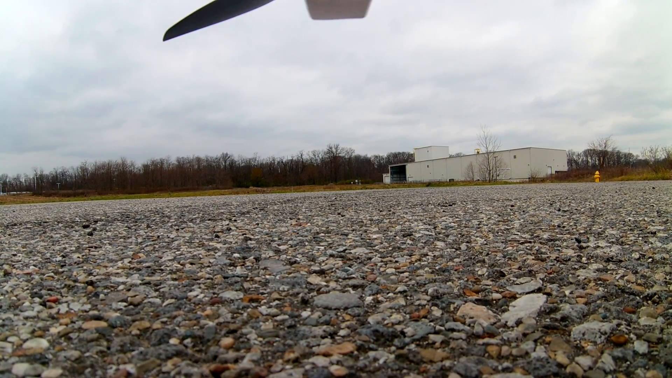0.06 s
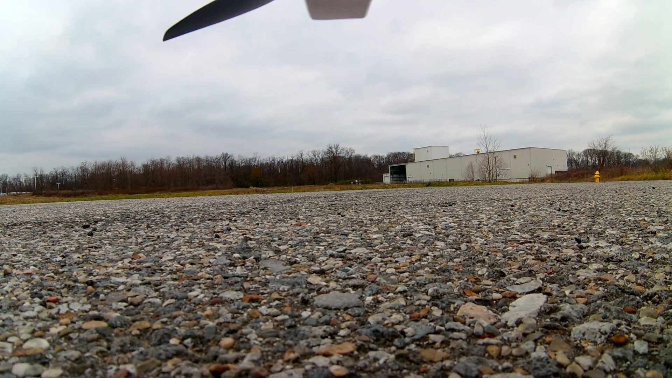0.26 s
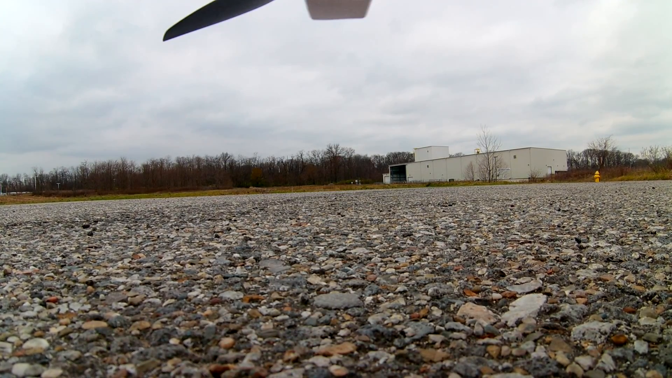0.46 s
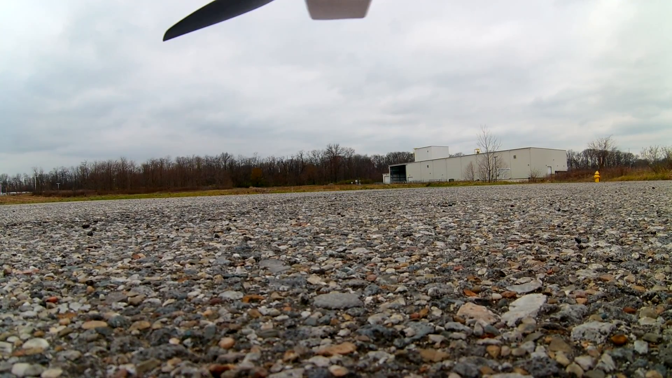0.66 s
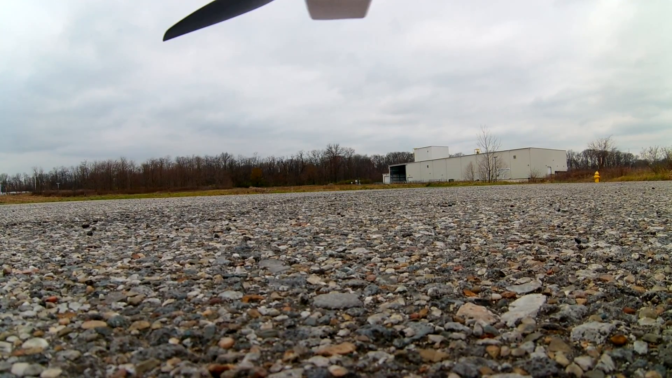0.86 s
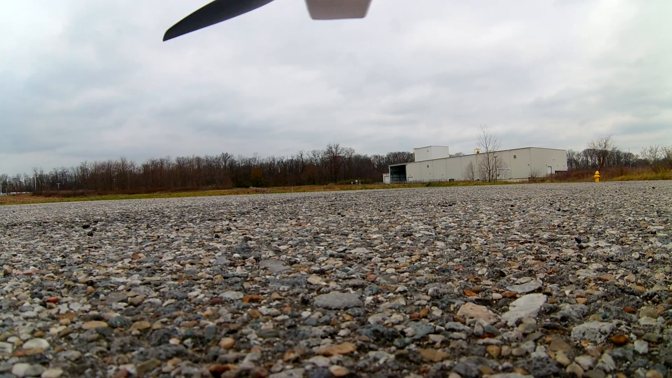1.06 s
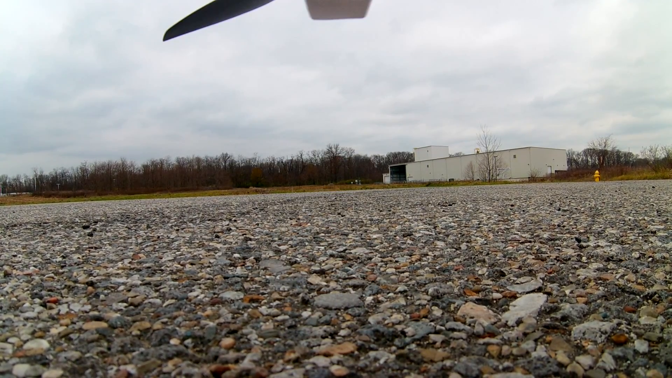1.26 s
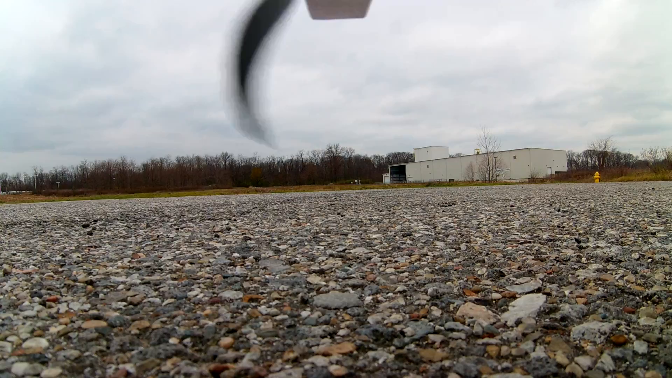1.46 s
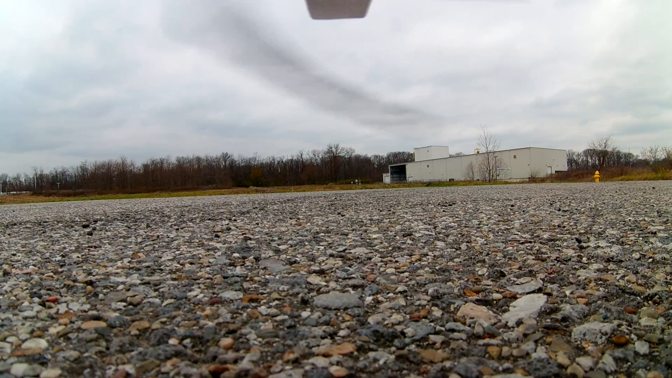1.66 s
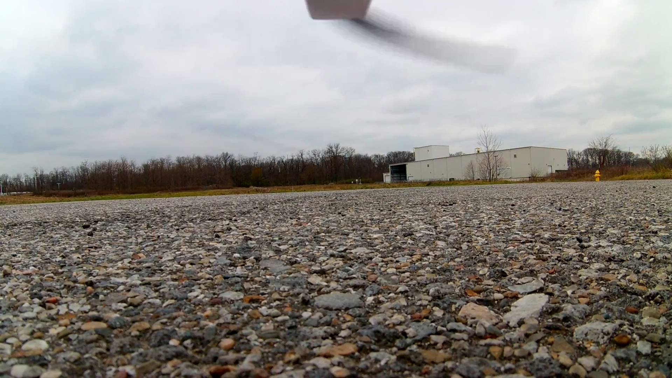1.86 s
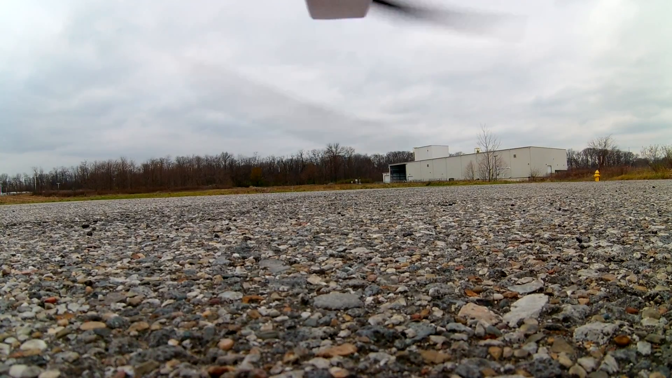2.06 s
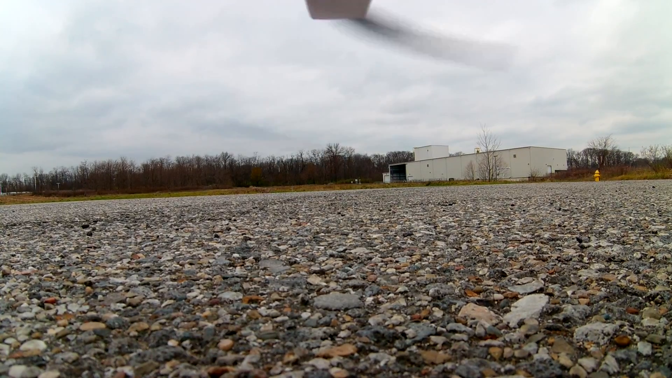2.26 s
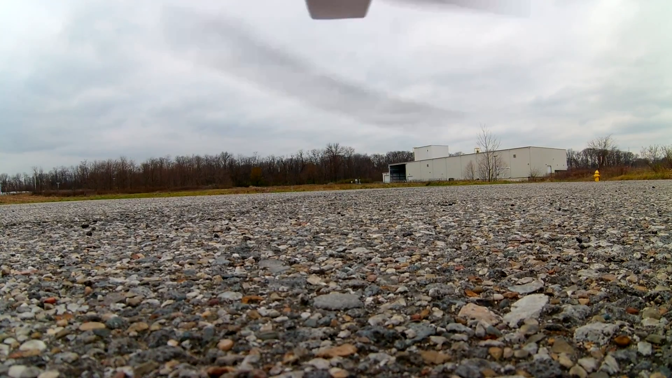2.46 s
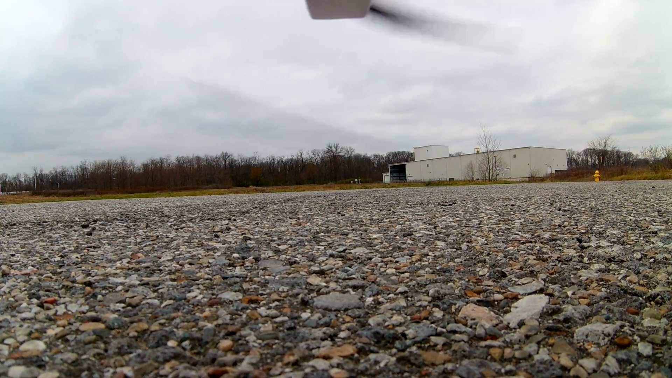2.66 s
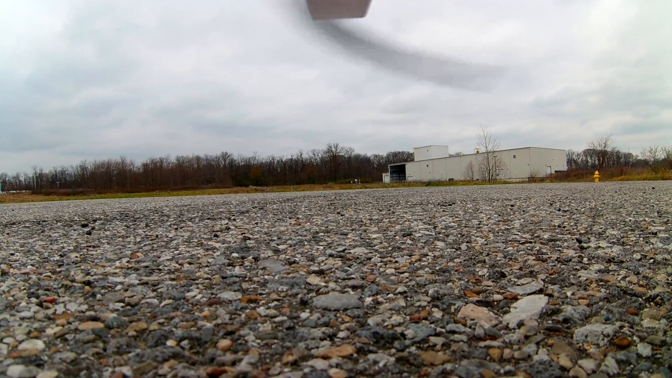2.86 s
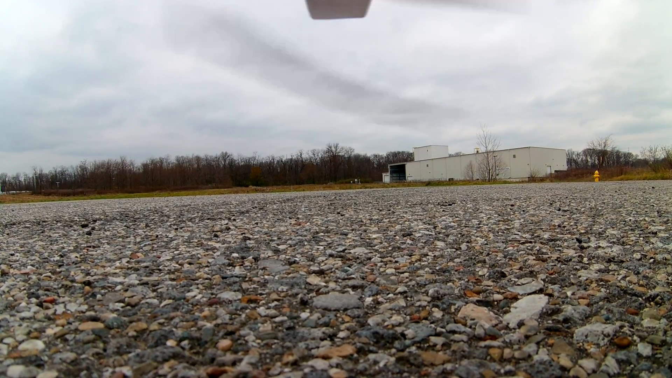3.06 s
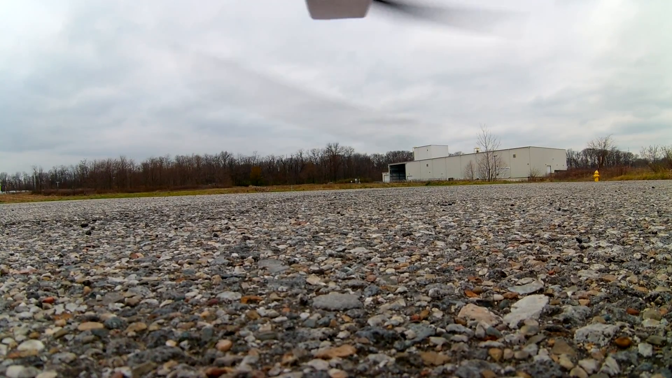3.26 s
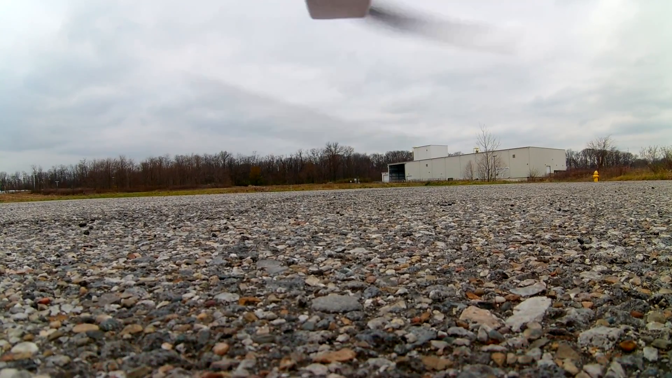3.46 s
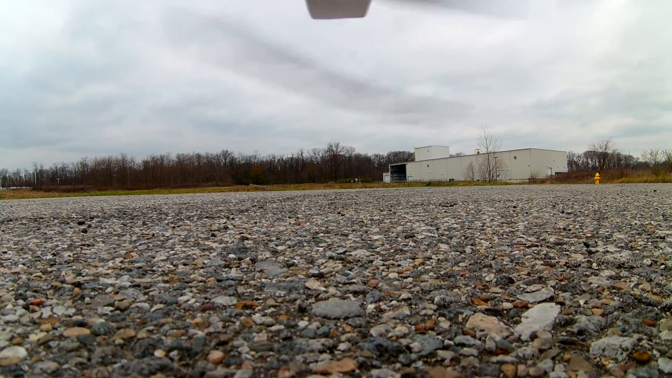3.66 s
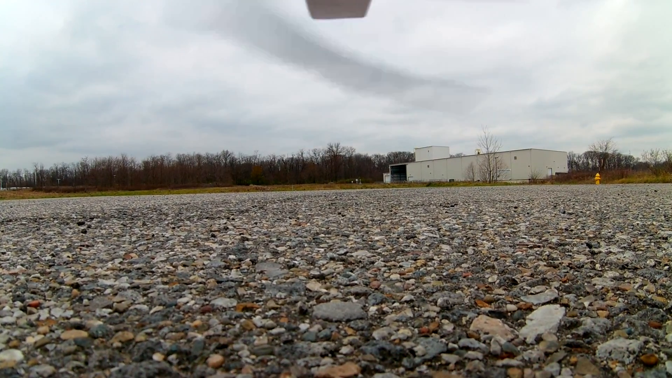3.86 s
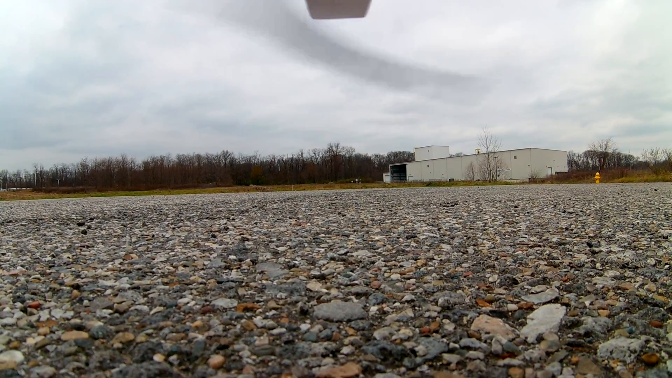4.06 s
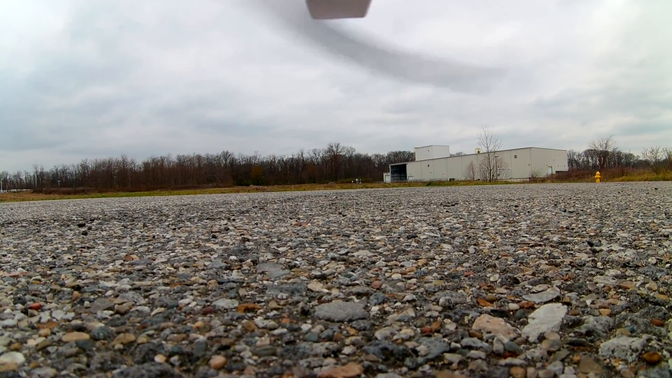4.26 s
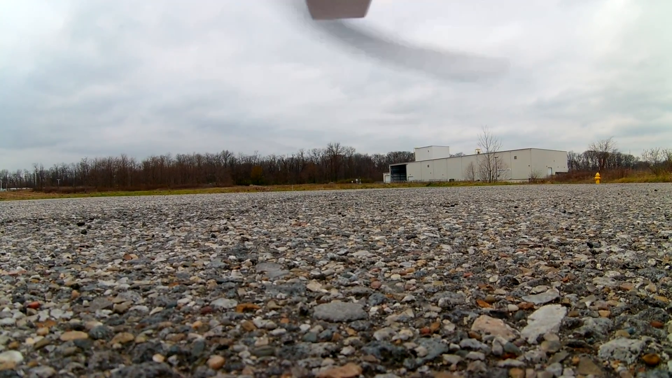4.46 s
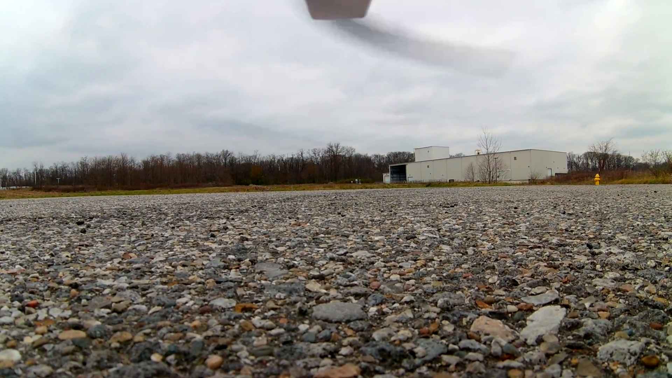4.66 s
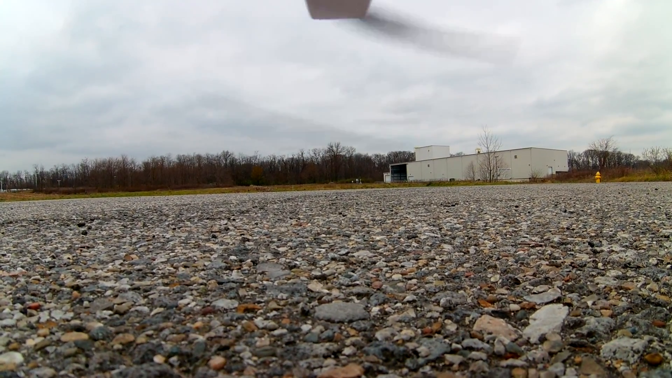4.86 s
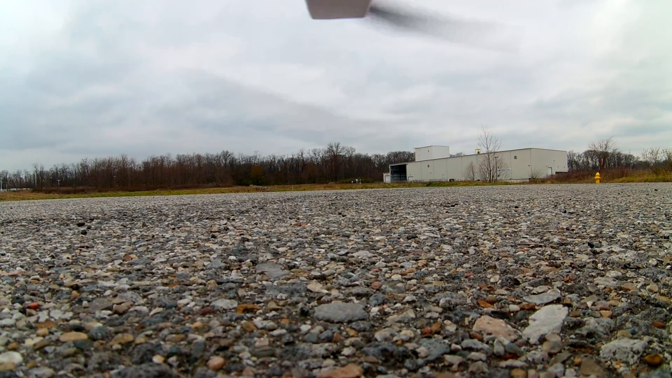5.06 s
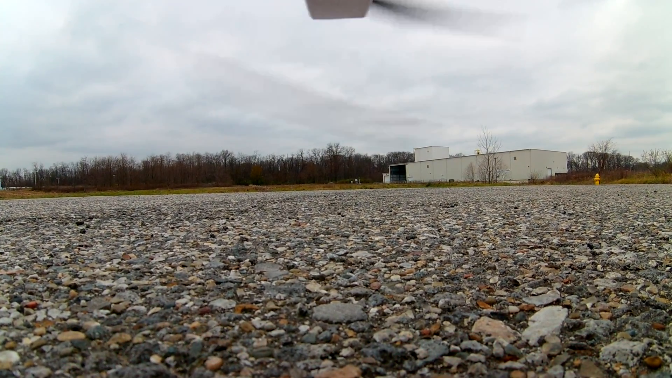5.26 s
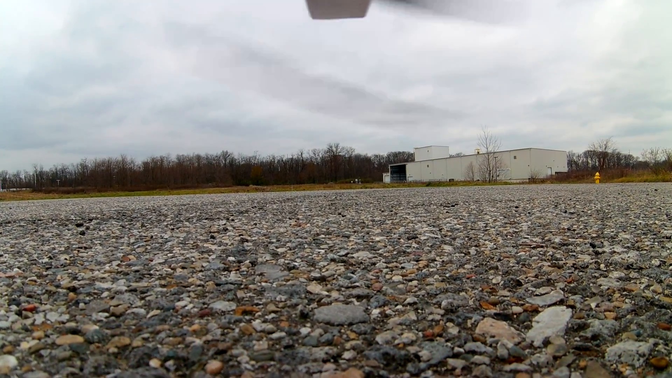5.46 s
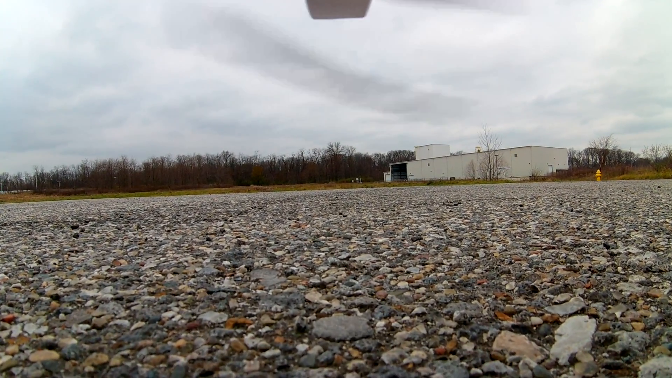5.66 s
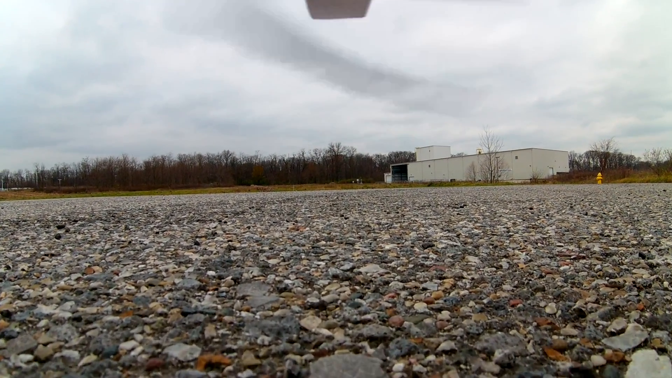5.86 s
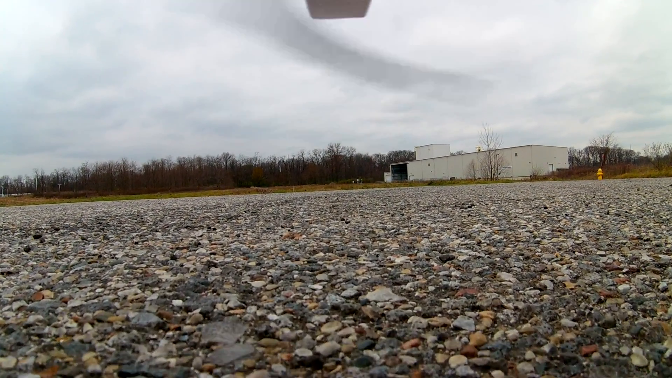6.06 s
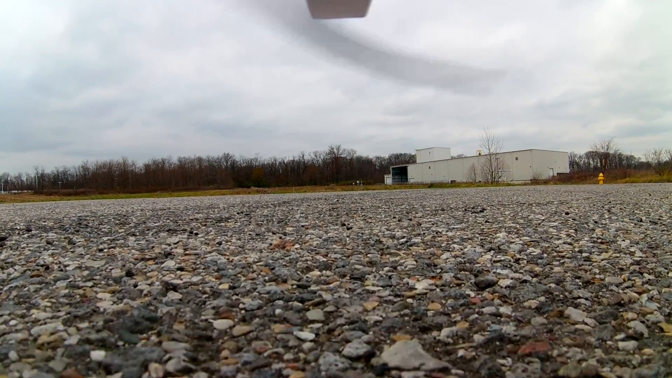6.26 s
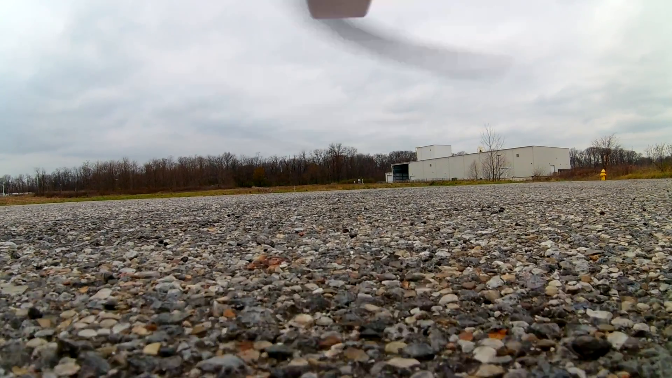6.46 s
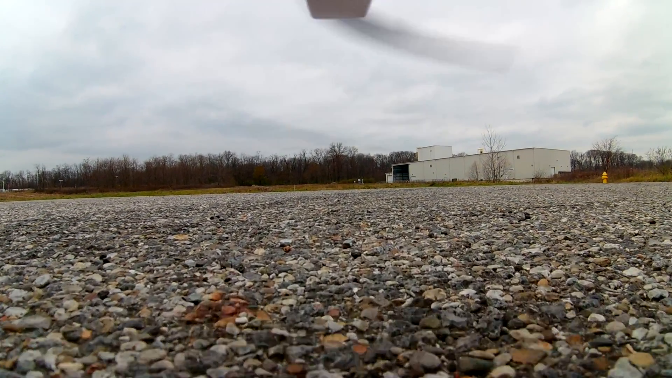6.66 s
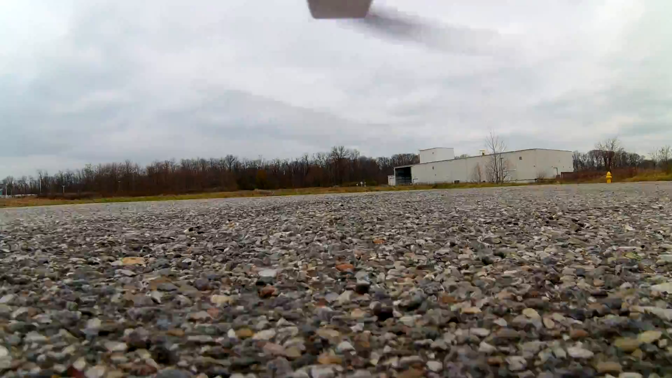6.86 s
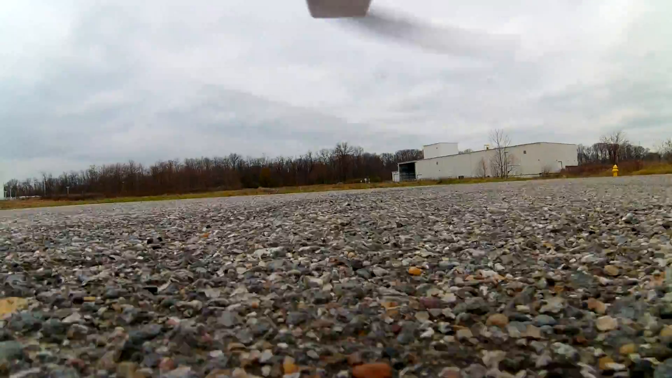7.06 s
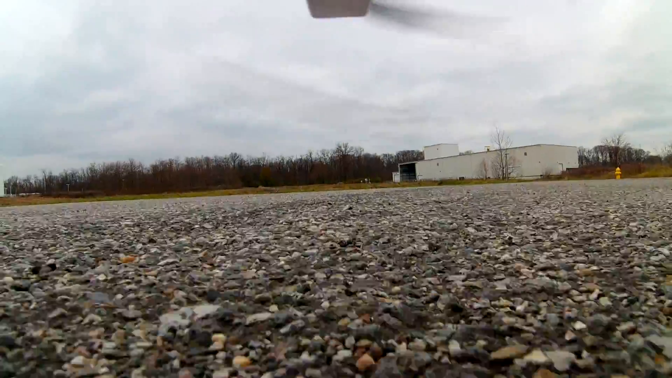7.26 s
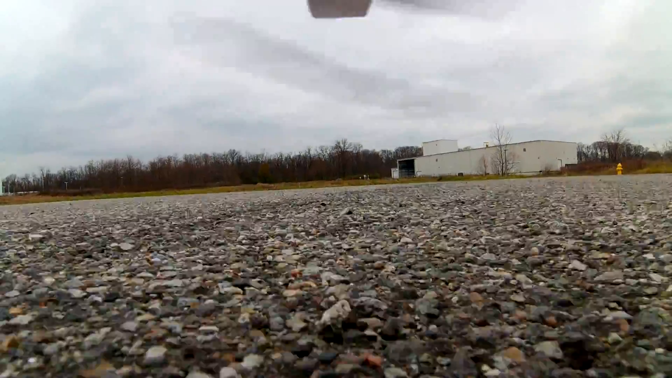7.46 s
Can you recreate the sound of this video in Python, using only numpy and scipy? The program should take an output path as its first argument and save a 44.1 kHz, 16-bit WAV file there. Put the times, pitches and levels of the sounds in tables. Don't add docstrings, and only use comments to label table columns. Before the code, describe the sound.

Small electric model plane motor stutters with quick clicks, then spins up to a loud, steady buzzing propeller whirr that steps higher twice, outdoors.

```python
import sys
import numpy as np
from scipy import signal
from scipy.fft import rfft, irfft
from scipy.io import wavfile
from scipy.ndimage import uniform_filter1d

SR = 44100
rng = np.random.default_rng(int(sys.argv[2]) if len(sys.argv) > 2 else 0)


def ratio_of_db(decibels):
    return 10 ** (np.asarray(decibels, float) / 20)


def wav_out(sig):
    wavfile.write(sys.argv[1], SR, np.round(np.clip(np.atleast_2d(sig).T, -1, 1) * 32767).astype(np.int16))


N = 330750

# f/Hz, density/dB
TRAFFIC = [(24, -57), (40, -22), (71, -13), (161, -22.5), (217, -10.5), (249, -14.5), (435, -14.5),
           (500, -15.5), (744, -7), (890, -5), (1250, -1), (1860, -5), (2360, -11), (3240, -10),
           (4640, -26.5), (6030, -55), (10200, -120)]
OPEN_AIR = [(3500, -12), (4800, 3), (6000, -7), (7400, -7), (7800, -25), (10900, -23), (11300, 0),
            (11700, -25)]
# f/Hz, level/dB rms
HUM = [(80, -80), (224, -70)]
# t/s, level/dB
CHIRPS = [
    (.145, -73),
    (.29, -80),
    (.588, -73),
    (.65, -74),
    (.905, -75),
    (1.02, -80),
]

# t/s, mount level/dB, crack level/dB
KICKS = [(0.0473, -50, -49), (1.1233, -37, -43), (1.1535, -40, -48), (1.1674, -43.5, -49),
         (1.1842, -36, -43), (1.2034, -47, -56), (1.2144, -52, -52), (1.2430, -36.5, -46),
         (1.2726, -37, -45), (1.304, -38, -44), (1.312, -41, -55), (1.335, -38, -46), (1.3454, -38, -51),
         (1.359, -49, -52), (1.3783, -32.5, -61), (1.4124, -36, -61), (1.416, -34, -61), (1.4188, -32, -59),
         (1.4244, -38, -58), (1.4314, -54, -54), (1.4554, -40, -55), (1.4643, -31, -59), (1.472, -33, -61),
         (1.4774, -34.5, -51), (1.482, -27, -55), (1.4864, -40, -57), (1.4974, -47, -56),
         (1.5055, -36, -58)]
# t/s, peak level/dB
GRIT = [
    (3.2415, -37),
    (6.1594, -36),
    (7.3114, -35),
    (7.4425, -22),
]
# f/Hz, width/Hz, level/dB
MOUNT = [(670, 60, -10), (900, 200, -12), (1600, 150, 0), (1990, 160, -5), (2530, 120, -7), (2900, 220, -6),
         (4150, 450, -16)]
# f/Hz, density/dB
CRACK = [(2700, -24), (3800, 2.0), (5500, -5), (7200, -13), (8000, -25)]
KICK_RASP = [(7500, -15), (8600, 2), (9800, -7), (11000, 0), (12500, -7), (13300, -25)]
GRIT_TICK = [(5000, -5), (8500, -7), (11000, 1), (12500, -8), (15000, -24), (15200, -40)]

# t/s, shaft turns asked for/Hz
THROTTLE = [(1.455, 0), (1.55, 71.15), (2.2, 71.15), (2.3, 72.1), (2.47, 71.8), (2.6, 70.2), (2.75, 71.1),
            (3.148, 71.0), (3.248, 79.89), (6.661, 79.89), (6.72, 88.73), (7.025, 88.73), (7.5, 95.0)]
# t/s, breeze through the blades level/dB, frame shaking on its wheels level/dB
UNREST = [(1.49, 6, 1.5), (1.55, 3, -2), (1.65, -10, 3), (1.72, 0, 1.2), (1.85, -1.5, 1), (2.0, -0.5, 0),
          (2.5, 0.5, 0), (2.8, -1.5, 0.5), (3.1, 0.5, 0.5), (3.4, 1, 1.5), (3.7, 1, -1.5), (4.7, -0.24, 0),
          (5.3, -0.25, 0.2), (6.0, -0.5, 1), (6.6, 0.9, 1.5), (6.85, 1, 3), (7.3, -0.5, 0.7),
          (7.47, 2.5, 1)]
# t/s, level/dB
PUFFS = [(1.825, -3.5), (2.28, -2.5), (2.43, -1), (3.8, 1), (4.68, 1.5), (4.85, -2.5), (5.43, -2),
         (5.72, -1), (6.13, 0.5), (6.52, -2), (7.32, 1)]
SPEED_LAWS = [
    (-24.5, 2.8, -51, 0.1),
    (-36, 2.5, -20.5, 0.71),
    (-33.5, 4.8, -49.5, 0.6),
    (-51.5, 5.4, -58, 0.6),
]
SHARES = [
    (0.83, 0.05),
    (0.05, 1),
    (0.86, 0.093),
    (0.55, 0.1),
]

# f/Hz, width/Hz, level/dB
FRAME = [(620, 235, -17.5), (1616, 65, -11.5), (1827, 206, -4), (1982, 283, -4.5), (2490, 306, -2.5),
         (3018, 190, -2.5), (3336, 230, -8.5), (4090, 350, -16), (4520, 150, -22)]
# f/Hz, density/dB
WASH = [(15, -64), (25, -51.5), (271, -13.5), (457, -3.5), (901, 0.5), (1810, -2), (2110, -10.5), (2520, 1),
        (2750, -11.5), (3060, -3.5), (4640, -20.5), (6030, -33), (10200, -120)]
BLADE_HISS = [(2600, -9.5), (3700, -2), (4650, -7.5), (5150, -13.5), (6400, -14.5), (7400, -18),
              (8400, -35)]
UPPER_HISS = [(7150, -22), (8100, -3.5), (8600, 0.5), (10250, -0.5), (10950, 4.5), (11500, -0.5),
              (12150, -5), (13000, -15), (14000, -16), (15100, -21), (15180, -62)]
PULL_RASP = [(7600, -15), (8500, -4), (9600, -11), (10900, 4), (12000, -12), (13000, -25)]

FRAME_ORDERS = (13, 25, 30, 31, 36, 37, 42, 56)
FRAME_ORDERS_DB = [-36, -37, -45, -41.5, -43, -38.5, -59, -40]
TORQUE_ORDERS = (14, 28, 42, 49)
TORQUE_ORDERS_DB = [-47, -41, -27, -53]
AIR_ORDERS = (1, 2, 13, 56, 84)
AIR_ORDERS_DB = [-65, -59, -40.5, -51.5, -82]

SIDE_ORDERS = (7, 12, 15, 20, 35, 28, 84)
# level/dB, gain at full torque/dB
SIDE_LINES = [(-80, 0), (-77, 0), (-70, 0), (-82, -5), (-84, 0), (-75, 19), (-95, 30)]
# f/Hz, half width/Hz, level on top/dB, level far off/dB
LINE_SWELLS = [
    (10750, 360, -56.5, -67),
    (7520, 400, -58.5, -79),
]
# f/Hz, width/Hz
BELL = (11000, 900)

# f/Hz, width/Hz
NOTCHES = [(7915, 600), (7915, 200), (7960, 200), (8020, 200), (13400, 900), (13400, 300)]

CARRIER_HZ = 7987
CRUISE_HZ, ROTOR_LAG_S, CATCH_S = 80, .135, 1.45


def rms_one(x):
    return x / np.sqrt(np.mean(x ** 2) + 1e-20)


def noise():
    return rng.standard_normal(N)


def in_time(rows):
    s, *columns = np.transpose(rows)
    return [np.interp(np.arange(N) / SR, s, c) for c in columns]


def colour(x, points):
    hz, level_db = np.transpose(points)
    f = np.maximum(np.arange(N // 2 + 1) * SR / N, 1)
    gain_db = np.interp(np.log(f), np.log(hz), level_db, -90, -90)
    return rms_one(irfft(rfft(x) * ratio_of_db(gain_db), N))


def drift(rate):
    r = np.exp(-2 * np.pi * rate / SR)
    x = rng.standard_normal(N + SR)
    return rms_one(signal.lfilter([1], [1, -2 * r, r * r], x)[SR:])


def resonance(x, hz, width_hz):
    r = np.exp(-np.pi * width_hz / SR)
    poles = [1, -2 * r * np.cos(2 * np.pi * hz / SR), r * r]
    return signal.lfilter([(1 - r * r) / 2, 0, (r * r - 1) / 2], poles, x)


def ring(x, modes):
    out = 0
    for k, (hz, width_hz, level_db) in enumerate(modes):
        out = out + (-1) ** k * ratio_of_db(level_db) * resonance(x, hz, width_hz)
    return signal.sosfilt(signal.butter(4, 4700, fs=SR, output="sos"), out)


def outdoors():
    t = np.arange(N) / SR
    hiss = ratio_of_db(-49) * colour(noise() * ratio_of_db(drift(13)), TRAFFIC)
    hiss += ratio_of_db(-75.5) * colour(noise(), OPEN_AIR)
    hum = sum(ratio_of_db(level_db - 4.5 + 2.5 * drift(4)) * np.sin(2 * np.pi * hz * t) for hz, level_db in HUM)
    chirps = np.zeros(N)
    for s, level_db in CHIRPS:
        for gap_s in (0, .017):
            chirps += ratio_of_db(level_db) * np.exp(-((t - s - gap_s) / .0045) ** 2)
    return hiss + hum + chirps * np.sin(2 * np.pi * 7360 * t)


def bursts(times, levels_db, decay_s, rise_s, held_s=0.):
    t, out = np.arange(SR // 5) / SR, np.zeros(N + SR)
    shape = (1 - np.exp(-t / rise_s)) * np.exp(-np.log(1000) * np.maximum(t - held_s, 0) / decay_s)
    for s, level_db in zip(times, levels_db):
        out[int(s * SR):int(s * SR) + len(t)] += ratio_of_db(level_db) * shape
    return out[:N]


def kick_train(times, levels_db, share=1):
    kick = bursts(times, levels_db, decay_s=share * .021, rise_s=.0004, held_s=share * .003)
    return kick + bursts(times, levels_db - 13, decay_s=.11, rise_s=.002)


def knocks():
    s, mount_db, crack_db = np.transpose(KICKS)
    rasp_db = -66.5 + .35 * (mount_db - mount_db.mean()) + .25 * (crack_db - crack_db.mean())
    short = 0.56
    dull = kick_train(s, mount_db - 6.5) * rms_one(ring(noise(), MOUNT))
    crack = kick_train(s, crack_db - 3.5, short) * colour(noise(), CRACK)
    rasp = kick_train(s, rasp_db - 1.2, short) * colour(noise(), KICK_RASP)
    hits = bursts(*np.transpose(GRIT), decay_s=0.0093, rise_s=.0007, held_s=0.0023)
    return dull + crack + rasp + ratio_of_db(-6.0) * hits * colour(noise(), GRIT_TICK)


def running():
    return np.clip((np.arange(N) / SR - CATCH_S) / 0.023, 0, 1)


def speed():
    r = np.exp(-1 / (ROTOR_LAG_S * SR))
    return signal.lfilter([1 - r], [1, -r], in_time(THROTTLE)[0])


def torque():
    gain_per_s = uniform_filter1d(np.gradient(speed()) * SR, SR // 10)
    return np.clip(gain_per_s / 130, 0, 1)


def load():
    t = np.arange(N) / SR
    fast_db = 20 * np.log10(np.maximum(speed(), 2) / CRUISE_HZ)
    breeze_db, shake_db = in_time(UNREST)
    puff_db = sum(level_db * np.exp(-((t - s) / 0.038) ** 2) for s, level_db in PUFFS)
    breeze_db = breeze_db + puff_db
    shake_db = shake_db + 0.38 * puff_db
    levels = []
    for (air_db, air_power, motor_db, motor_power), (breeze, shake) in zip(SPEED_LAWS, SHARES):
        air = ratio_of_db(2 * (air_db + air_power * fast_db))
        motor = ratio_of_db(2 * (motor_db + motor_power * fast_db))
        levels.append(10 * np.log10(air + motor) + breeze * breeze_db + shake * shake_db)
    return levels


def propeller(turn):
    wash_db, buzz_db, blade_db, upper_db = load()
    pull = torque()
    gust = 0.6 * drift(7.0) + 4.1 * drift(250) + 6.2 * np.clip(drift(870), -3, 2.3)
    blade_pass = np.cos(2 * turn)
    wash = colour(noise() * ratio_of_db(0.27 * gust + drift(16)), WASH)
    low = signal.sosfiltfilt(signal.butter(2, 470, fs=SR, output="sos"), wash)
    wash = wash - np.clip(.03 * (speed() - CRUISE_HZ), 0, .8) * low
    buzz = noise() * ratio_of_db(0.24 * gust + 0.59 * drift(30) + 1.2 * np.cos(turn))
    buzz = rms_one(ring(buzz, FRAME))
    blade = colour(noise() * ratio_of_db(0.55 * gust + 0.4 * drift(30) + .5 * blade_pass), BLADE_HISS)
    upper = colour(noise() * ratio_of_db(0.38 * gust + 0.27 * drift(21) + 1.7 * blade_pass), UPPER_HISS)
    rasp = colour(noise() * ratio_of_db(.4 * gust), PULL_RASP)
    moved = ratio_of_db(wash_db + 5.5) * wash + ratio_of_db(buzz_db - 2.5) * buzz
    moved += ratio_of_db(blade_db - 1.7) * blade + ratio_of_db(upper_db - 1.0) * upper
    airflow = 1 - .4 * pull
    return airflow * moved + pull * ratio_of_db(upper_db + 1.0) * rasp


def orders(turn, multiples, levels_db, flutter_db, flutter_hz, sway_rad, sway_hz):
    out = np.zeros(N)
    for k, level_db in zip(multiples, levels_db):
        level = ratio_of_db(level_db + flutter_db * drift(flutter_hz))
        out += level * np.sin(k * turn + sway_rad * drift(sway_hz))
    return out


def whirr(turn):
    wash_db, buzz_db = load()[:2]
    pull_share = torque()
    shake = orders(turn, FRAME_ORDERS, FRAME_ORDERS_DB, 1.56, 34, .5, 34)
    pull = orders(turn, TORQUE_ORDERS, TORQUE_ORDERS_DB, 2.5, 28, .7, 10)
    direct = orders(turn, AIR_ORDERS, AIR_ORDERS_DB, 1.9, 6.8, 1.74, 6)
    pull *= 1 + .4 * np.cos(2 * turn)
    slow = np.clip(1.4 - speed() / 45, 0, 1)
    rattle = ratio_of_db(-4.0) * slow * rms_one(ring(noise() * ratio_of_db(2.0 * drift(70)), MOUNT))
    body = resonance(resonance(pull, 1700, 620), 1730, 600) + 0.59 * ring(pull, FRAME) + ring(pull, MOUNT)
    pulled = pull_share * ratio_of_db(buzz_db) * (ratio_of_db(22.5) * body + rattle)
    shaken = ratio_of_db(buzz_db + 31.0) * ring(shake, FRAME) * (1 - 0.18 * pull_share)
    return shaken + pulled + ratio_of_db(wash_db + 27.5) * np.clip(speed() / 55, 0, 1) ** 2 * direct


def line_levels():
    levels = [-59 + .2 * (speed() - CRUISE_HZ) + 3 * torque()]
    for k, (hz, width_hz, top_db, far_db) in zip((42, -14), LINE_SWELLS):
        near = np.exp(-((CARRIER_HZ + k * speed() - hz) / width_hz) ** 4)
        levels.append(far_db + (top_db - far_db) * near)
    return levels


def controller(turn):
    carrier = 2 * np.pi * CARRIER_HZ * np.arange(N) / SR
    pull = torque()
    weak, strong = np.zeros(N), np.zeros(N)
    for k, (level_db, gain_db) in zip(SIDE_ORDERS, SIDE_LINES):
        weak += ratio_of_db(level_db + gain_db * pull) * np.sin(carrier + k * turn)
    for k, level_db in zip((14, 42, -14), line_levels()):
        strong += ratio_of_db(level_db + 3.5 + 1.3 * drift(12)) * np.sin(carrier + k * turn)
    second = ratio_of_db(-89) * np.sin(2 * carrier - 14 * turn)
    return strong + .2 * weak + resonance(weak, *BELL) + second


def scene():
    turn = 2 * np.pi * np.cumsum(speed()) / SR
    motor = running() * (propeller(turn) + whirr(turn) + controller(turn))
    return (outdoors() + knocks() + motor)[None]


def band_limit(x):
    return signal.sosfilt(signal.butter(12, 15720, fs=SR, output="sos"), x)


def record(dry):
    x = 1.15 * np.tanh(dry / 1.15)
    for hz, width_hz in NOTCHES:
        x = x - resonance(x, hz, width_hz)
    x = signal.sosfilt(signal.ellip(8, 1, 50, 15120, fs=SR, output="sos"), x)
    level_db = 10 * np.log10(uniform_filter1d(x ** 2, SR // 8) + 1e-12)
    hiss_db = -74.5 - 4 * np.maximum(level_db + 26.5, 0)
    hiss = ratio_of_db(hiss_db) * rng.standard_normal(x.shape)
    return band_limit(x + hiss)


dry = scene()
out = record(dry)
wav_out(out)
```